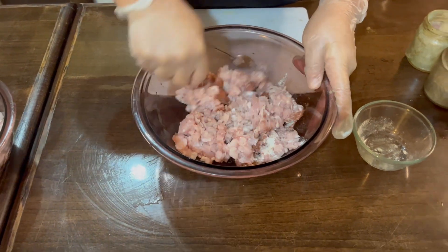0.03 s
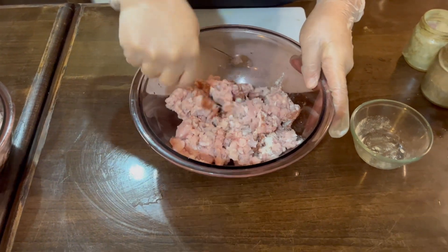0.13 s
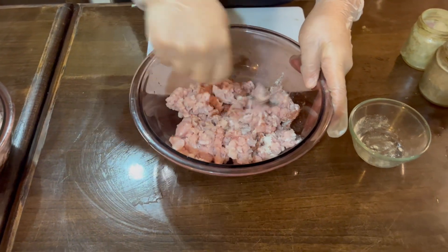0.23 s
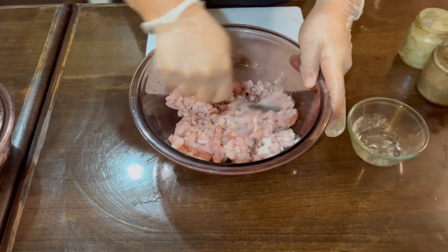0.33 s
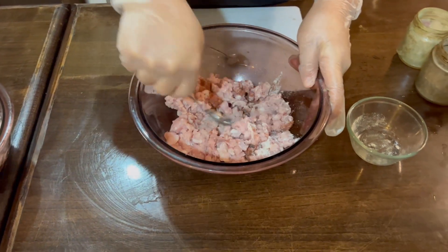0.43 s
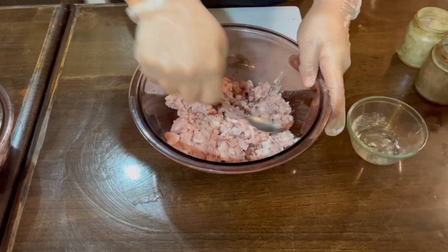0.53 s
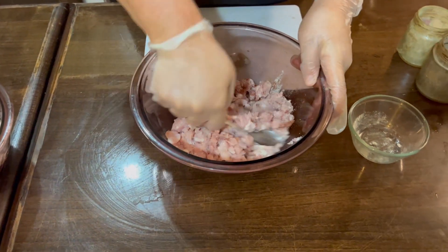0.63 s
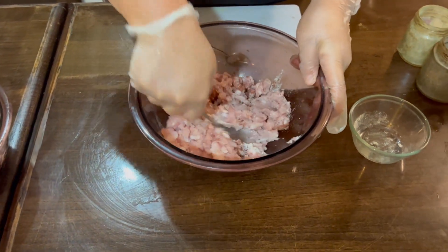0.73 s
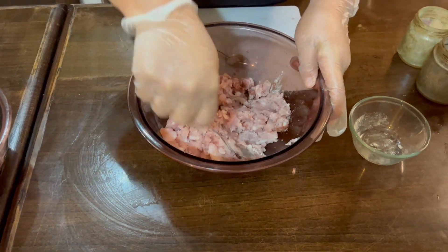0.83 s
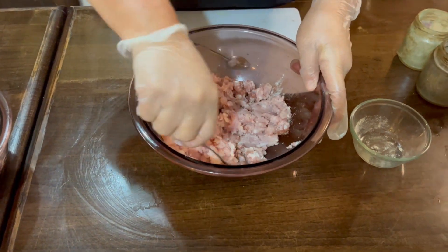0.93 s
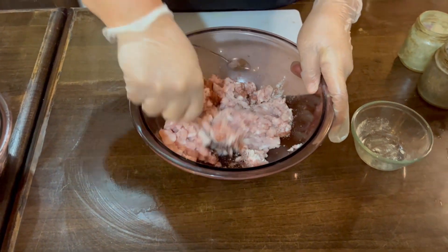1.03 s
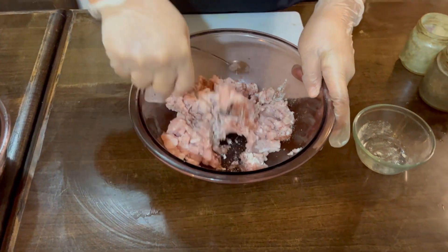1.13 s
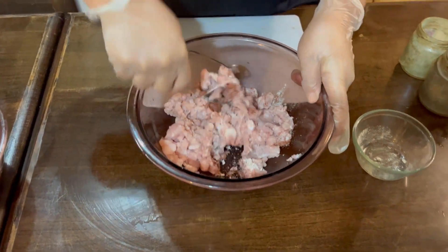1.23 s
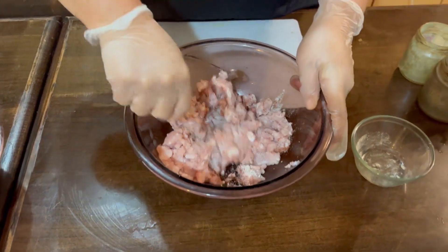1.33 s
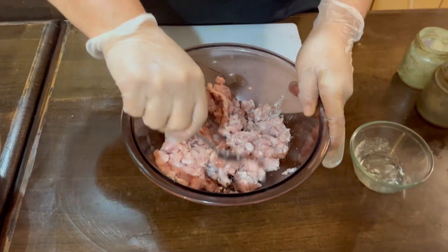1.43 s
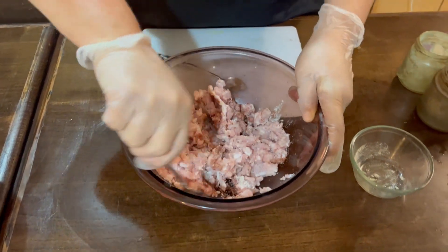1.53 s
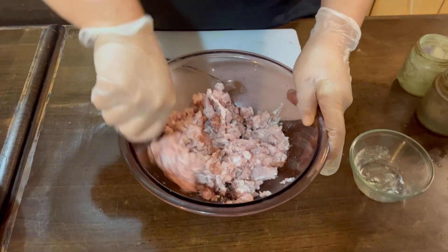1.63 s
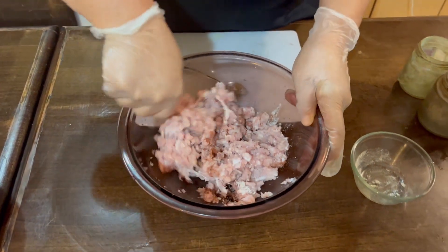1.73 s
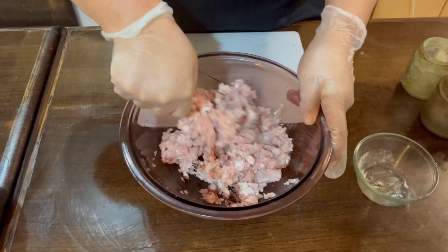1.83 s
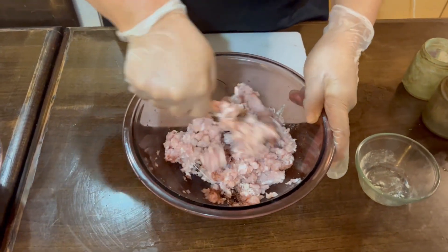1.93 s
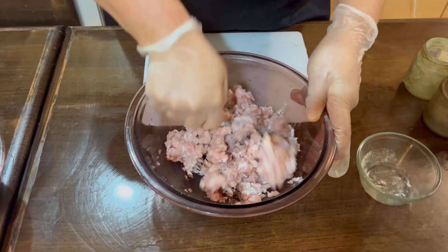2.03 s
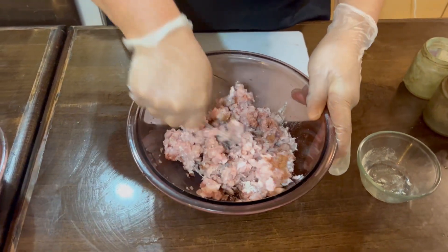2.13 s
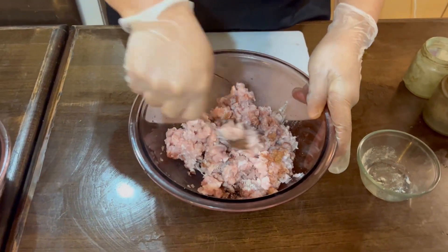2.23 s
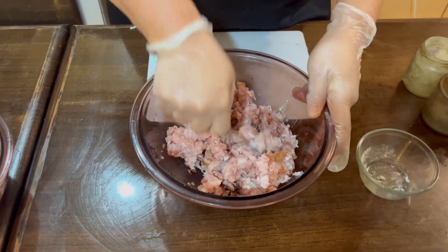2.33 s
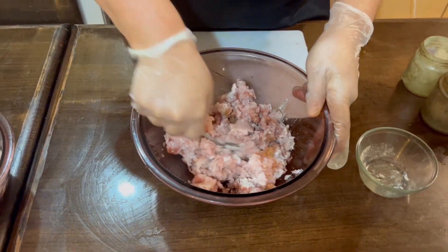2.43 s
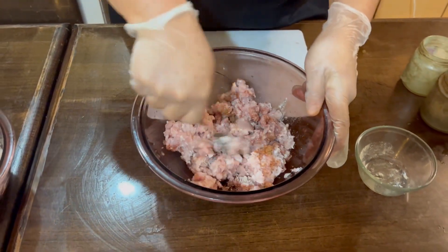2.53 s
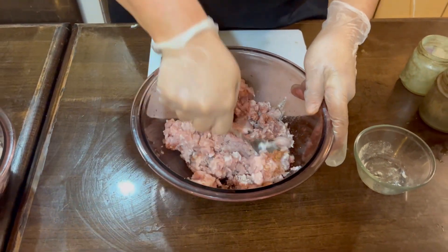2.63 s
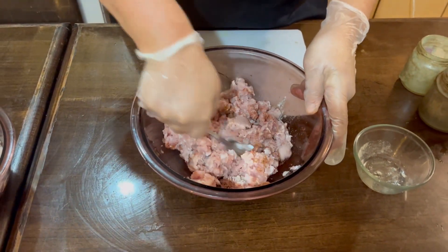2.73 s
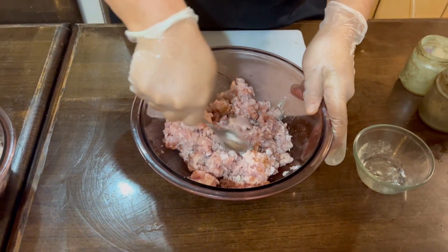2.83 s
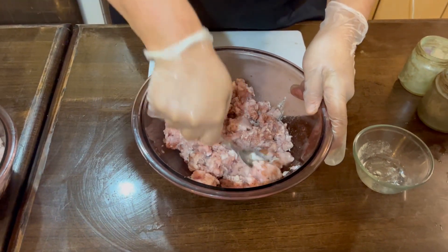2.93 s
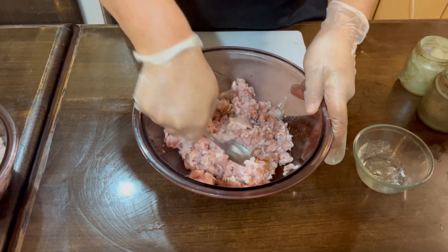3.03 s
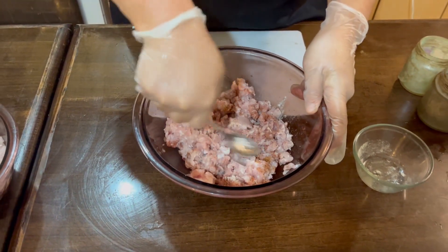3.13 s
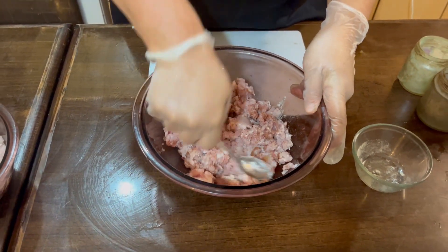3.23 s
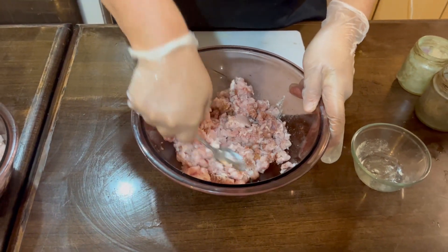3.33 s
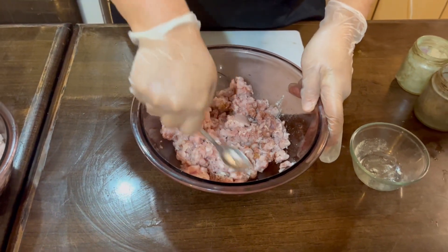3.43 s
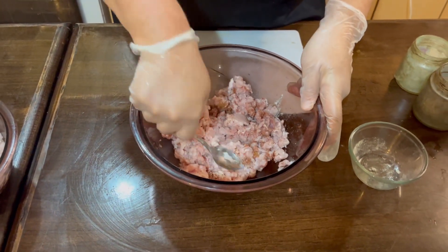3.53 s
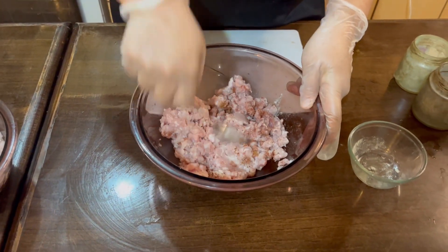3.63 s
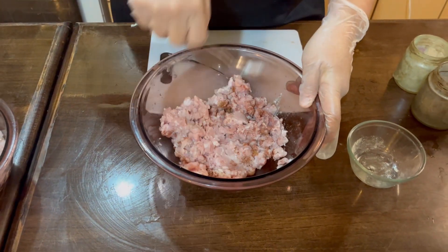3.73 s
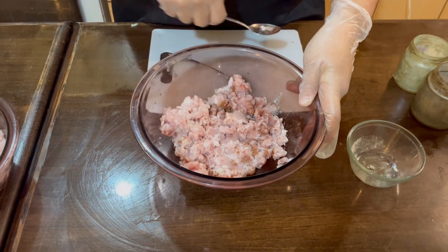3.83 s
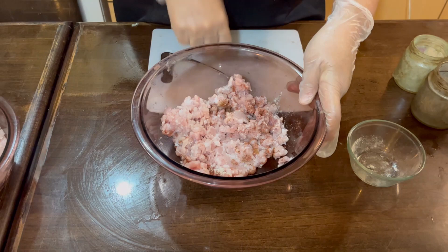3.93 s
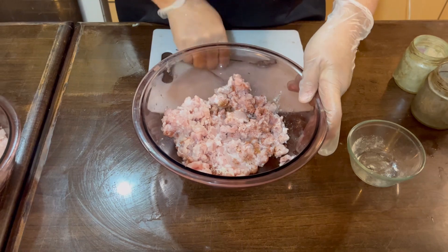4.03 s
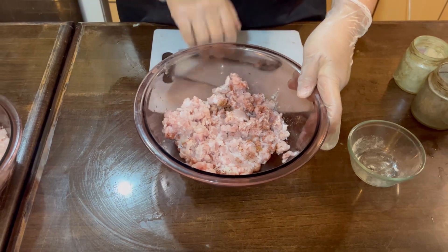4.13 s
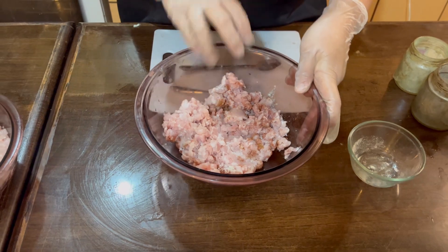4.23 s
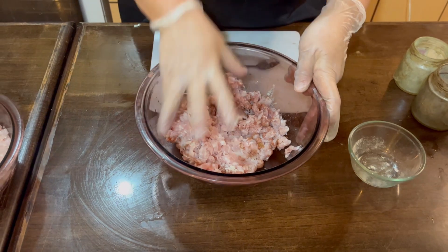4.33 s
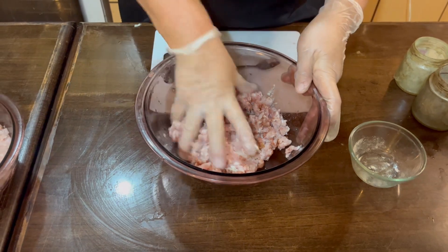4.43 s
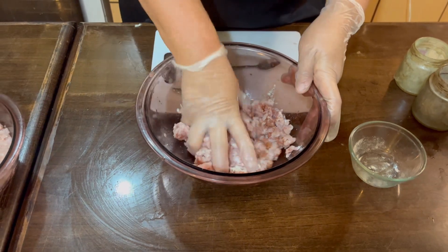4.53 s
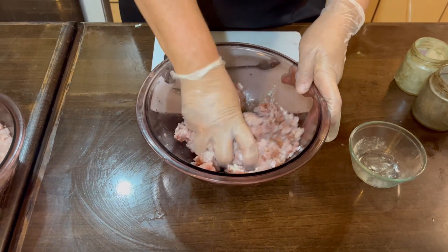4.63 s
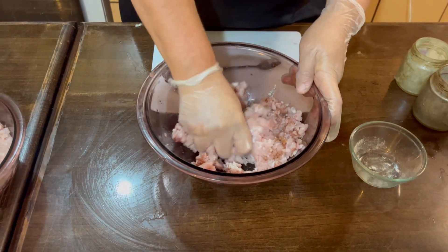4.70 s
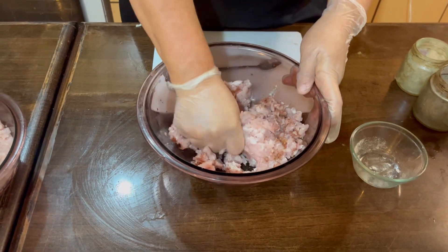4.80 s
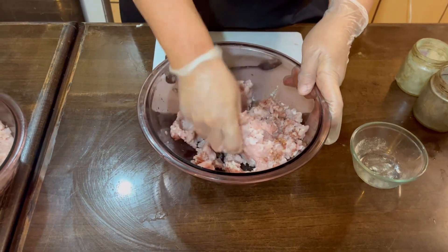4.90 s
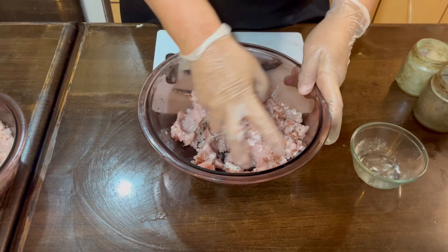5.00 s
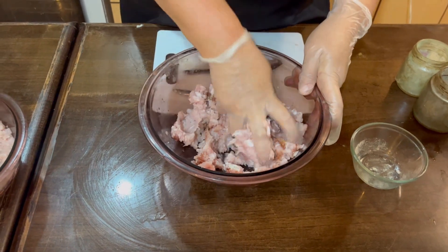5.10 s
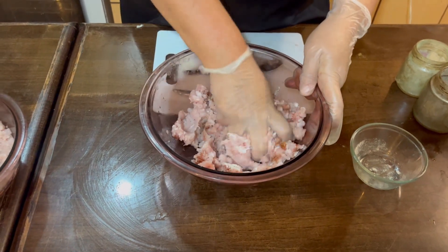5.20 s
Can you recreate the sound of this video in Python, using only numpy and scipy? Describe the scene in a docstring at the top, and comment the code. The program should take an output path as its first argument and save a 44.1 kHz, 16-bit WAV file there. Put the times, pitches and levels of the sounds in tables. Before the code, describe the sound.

Close, moist mixing of minced meat, glass taps and woody knocks; a spoon drops loudly on a board, rattles, then softer hand squelching.

```python
"""Wet minced meat is worked in a glass bowl, first with a spoon, then with gloved fingers: noise
and short ringing grains crackle and slosh, and brief noise bursts pop. Damped modes sound the spoon's
taps on the glass and the bowl's knocks, shaking and groans on a wooden table; late on the spoon drops
on a chopping board, bounces and rattles. A quiet kitchen adds a diffuse tail and room tone;
a two-port microphone is close by."""
import sys
import numpy as np
from scipy import signal
from scipy.fft import rfft, irfft
from scipy.io import wavfile
from scipy.ndimage import uniform_filter1d

SR = 44100
rng = np.random.default_rng(int(sys.argv[2]) if len(sys.argv) > 2 else 0)


def store_pcm(level_fs):
    """Save levels as 16-bit WAV."""
    pcm = np.round(np.clip(level_fs, -1, 1) * 32767).astype(np.int16)
    wavfile.write(sys.argv[1], SR, np.atleast_2d(pcm).T)


N = 232040

# Pressure of the bowl, which shakes the wood. Each row: time in seconds, rms level in dB.
SHAKE = [(0, -30.5), (.25, -38), (.8, -38.5), (1.9, -43), (4, -42), (5.26, -41)]
# Strokes through the mince. Each row: start in seconds, length in seconds, crackle in dB, wet slosh in dB.
STROKES = [(0.032, 0.13, -44, -46.5), (0.195, 0.18, -54, -51.5), (0.302, 0.16, -43.5, -45),
           (0.545, 0.11, -58, -49.5), (0.619, 0.072, -32.5, -33), (0.737, 0.046, -42.5, -48),
           (0.89, 0.11, -42.5, -51), (0.998, 0.0076, -34.5, -52), (1.054, 0.13, -38, -43),
           (1.247, 0.017, -37.5, -51), (1.326, 0.072, -40, -44), (1.61, 0.2, -32.5, -38.5),
           (1.68, 0.062, -32.5, -40.5), (1.808, 0.14, -44.5, -43), (1.887, 0.12, -50, -65),
           (2.038, 0.15, -43.5, -49), (2.36, 0.06, -51, -42.5), (2.434, 0.074, -41, -51.5),
           (2.685, 0.05, -42.5, -44.5), (2.776, 0.067, -44.5, -55), (2.945, 0.13, -47.5, -51),
           (3.108, 0.0088, -46.5, -52), (3.263, 0.13, -44, -52.5), (3.514, 0.0081, -44, -53),
           (3.6, 0.0083, -43, -53), (4.468, 1, -42.5, -45.5), (4.629, 0.11, -38, -41.5),
           (4.716, 0.095, -48, -43), (4.842, 0.16, -42.5, -49.5), (5.113, 0.099, -44, -46),
           (5.226, 0.16, -43, -41)]
# Mince tearing loose. Each row: time in seconds, peak of the crack in dB, pitch in Hz.
POPS = [(0.698, -25, 2900), (1.121, -23.5, 6500), (1.1579, -24, 3250), (1.315, -23, 6800),
        (1.6027, -13.5, 5500), (1.68, -20, 2020), (1.683, -8, 12000), (1.709, -9.5, 1914),
        (1.7075, -11.5, 9000), (1.8582, -26, 11000), (1.737, -14.5, 5350), (2.0952, -29.5, 5950),
        (2.14, -31.5, 4000), (2.342, -34.5, 3160), (2.374, -26.5, 3340), (2.441, -29.5, 6050),
        (2.475, -27.5, 5000), (2.516, -29, 6500), (2.777, -31.5, 2550), (2.825, -30.5, 3620),
        (3.246, -32, 3750), (3.26, -26, 3920), (2.9813, -24.5, 3540), (3.1112, -31, 5800),
        (3.3843, -31.5, 3700), (3.6075, -24.5, 4100), (4.619, -25, 1680), (4.481, -29, 3000),
        (4.755, -25, 3000), (4.7924, -11, 11600), (4.8007, -16.5, 11500), (4.905, -21, 3320),
        (4.918, -11.5, 5270), (4.926, -15, 6500)]
# Spoon on glass. Each row: start in seconds, peak of the crack in dB, ring of the bowl in dB,
# ring of its lowest mode in dB, peak of the dull knock in dB.
TAPS = [(0.308, -1.5, -33.5, -50, -19), (0.619, -11, -36, -54, -26.5), (0.88, -25, -32.5, -47, -30),
        (1.286, -38, -67, -42.5, -33.5), (1.5425, -32, -29, -52, -19), (1.564, -60, -50, -30.5, -45),
        (2.711, -24.5, -62, -51, -31), (3.512, -25, -67, -61, -34), (5.105, -43, -50, -40, -57)]
# Deep thumps through the table legs. Each row: time in seconds, strength in dB, slap of the bowl foot in dB.
THUMPS = [(0.059, -12.5, -25.5), (0.309, -22, -40), (0.622, -18.5, -45), (0.692, -14, -49),
          (0.887, -26, -56), (1.295, -9.5, -27), (2.05, -25.5, -39.5), (3.316, -13, -34), (3.503, -18, -43),
          (4.199, -12, -14.5), (4.361, -14.5, -40), (4.477, -15.5, -59), (4.879, -12.5, -78),
          (5.102, -19.5, -28.5)]
# Bowl knocking the table. Each row: time in seconds, strength in dB.
KNOCKS = [(0.066, -16), (0.316, -20.5), (0.527, -28.5), (0.57, -28.5), (0.623, -21), (0.696, -21.5),
          (0.874, -24.5), (0.906, -32), (0.945, -39), (0.986, -32), (1.287, -26), (1.474, -30), (1.55, -22),
          (2.588, -23.5), (2.611, -23), (2.688, -32), (2.733, -30), (2.891, -24.5), (2.936, -28),
          (3.013, -34), (3.058, -40), (3.181, -21), (3.204, -25.5), (3.27, -25), (3.333, -29.5),
          (3.513, -25.5), (4.191, -15), (4.357, -20.5), (4.685, -25.5), (4.746, -22.5), (4.811, -26),
          (4.879, -20.5), (5.101, -24.5)]
# The bowl's foot slides and the table groans. Each row: start in seconds, length in seconds,
# rms level in dB, pitch in Hz.
GROANS = [(0.75, 0.087, -33, 170), (0.928, 0.22, -32, 153), (0.915, 0.058, -35, 177.6),
          (2.646, 0.15, -37.5, 153), (4.846, 0.14, -29, 153)]
# Spoon landing on the board. Each row: time in seconds, peak of the crack in dB, board in dB,
# table in dB, spoon ring in dB.
LANDINGS = [(3.974, 0.5, -7.5, -51, -36), (4.2127, -3, -34, -5.5, -32.5), (4.216, -5, -21.5, -6.5, -45),
            (4.285, -6, -26, -31, -49), (4.2987, -15, -50, -18, -36)]
# The spoon rocks on the board. Each row: start in seconds, length in seconds, level in dB.
RATTLES = [(3.977, 0.0058, -16), (4.044, 0.38, -23), (4.219, 0.0055, -14.5), (4.285, 0.033, -21)]
# Light touches of the rocking spoon. Each row: time in seconds, strength in dB, pitch in Hz.
TICKS = [(4.0551, -30, 2930), (4.0862, -22, 1200)]

# Modes of the table top, of the table on its legs, of the bowl, the board and the spoon.
# Each row: frequency in Hz, relative level in dB, t60 in seconds.
TABLE_MODES = [(152.6, -11.5, 0.48), (176.7, -12.5, 0.51), (210.2, 1.5, 0.19), (248, -2.5, 0.049),
               (293.6, -7.5, 0.075), (448, -15, 0.096)]
THUMP_MODES = [(60, -12, 0.21), (101, -14, 0.097)]
BOWL_MODES = [(540, 2, 0.22), (1442, -13.5, 0.56), (1180, 2, 0.035), (1456, -5, 0.32), (2203, 12, 0.019),
              (4150, -0.5, 0.12), (4440, 9, 0.043), (5500, -6, 0.064), (6500, -8, 0.031)]
BOARD_MODES = [(342.3, 5, 0.14), (450, -2.5, 0.095), (537.4, -5, 0.086), (691, -2, 0.029),
               (897, 5.5, 0.023), (1200, 3, 0.017), (1470, -5.5, 0.05), (1810, 4.5, 0.021),
               (2590, -2.5, 0.025)]
SPOON_MODES = [(7150, 3, 0.1), (8500, 0, 0.1), (9500, 3, 0.24), (11670, 1, .2)]

# Spectral weightings of crackle, slosh, room tone and rattle. Each row: frequency in Hz, relative level in dB.
CRACKLE_SPECTRUM = [(1500, -11.5), (3500, -10), (6500, -2.5), (9000, 2.5), (12000, 0.5), (15500, 1.5)]
SLOSH_SPECTRUM = [(350, 7), (1000, 1), (2000, 0), (3500, 2), (6000, -9.5)]
HUSH_SPECTRUM = [(30, -35), (55, 2.5), (100, -4), (200, -0.5), (480, -10), (800, -22), (1200, -13),
                 (1650, -9.5), (2400, -21), (5000, -31), (15500, -34.5)]
RATTLE_SPECTRUM = [(70, -69), (150, -20.5), (225, -4.5), (400, -6), (750, -22), (1300, -22), (2500, -24.5),
                   (7000, -31), (15000, -40.5)]

# Phase between the ports. Each row: frequency in Hz, lead of the left in radians.
LEAD = [(0, 0.19), (1800, 0.73), (3000, 0.97), (4650, 1), (5700, -1.2), (6600, -1.2), (7700, -2.8),
        (8900, -3.4), (11200, -5.9), (12900, -6.8), (15300, -9.5)]
# Correlation of diffuse sound at the ports. Each row: frequency in Hz, likeness from 0 to 1.
ALIKE = [(60, 0.91), (300, 1), (700, 0.21), (1400, 0), (2400, 0.44), (9000, 0.9)]
# Level between the ports. Each row: frequency in Hz, left over right in dB.
LEFT_OVER_RIGHT = [(60, 1), (200, 3), (600, 1), (2000, 1.5), (6000, 1)]
# Decay of the kitchen. Each row: frequency in Hz, t60 in seconds.
KITCHEN_T60 = [(100, 0.55), (1000, 0.38), (5000, 0.27), (15000, 0.14)]

KITCHEN_DB, HUSH_DB = -6.5, -49.5
CUTOFF_HZ = 15735
PRESSED_S = (2.5, 3.3)   # from, to: the bowl is held down hard
PRESSED, UNDER_BOARD = (0.95, 0.64), (1.065, 0.67)   # loads on the table: (pitch ratio, t60 ratio)
SPREAD_DB = 1.5   # how much blows differ from mode to mode
JOLT_DB = 2   # unevenness of shake, hiss and rattle
STROKE_RISE_DB_PER_S, STROKE_FALL_DB_PER_S = 727, 367
CRACKLE_SAG_DB_PER_S, SLOSH_SAG_DB_PER_S = 32.5, 49   # fading while the stroke lasts
GROAN_RISE_DB_PER_S, GROAN_SAG_DB_PER_S, GROAN_FALL_DB_PER_S = 142, 42, 295
RATTLE_RISE_DB_PER_S, RATTLE_SAG_DB_PER_S, RATTLE_FALL_DB_PER_S = 2000, 35, 221
SPOON_SMEAR_DB, GLOVE_SMEAR_DB, GLOVE_FROM_S = -7.5, 1, 4.42   # hiss under the clicks, more under the glove
WET_SMEAR_DB = 9   # extra hiss that smooths the slosh
POP_NOTE_DB = -8.5   # hollow note of a pop, against its crack
GLINT_DB = -28.5   # upper modes of the bowl, against the crack of the tap
CHATTER_PER_S, CHATTER_DB = 60, 3   # distinct touches standing out of the rattle
BOARD_RATTLE_DB = -14.5   # ringing board, against the rattle's noise
TICK_T60_S = 0.04


def from_db(db):
    """Logarithmic level: 20 dB is a factor of ten in amplitude."""
    return 10 ** (np.asarray(db) / 20)


def rms_one(x):
    """Normalisation: scale to rms 1."""
    return x / np.sqrt(np.mean(x ** 2) + 1e-20)


def at_hz(points, hz):
    """Interpolation: read a table along log frequency."""
    table_hz, values = np.transpose(points)
    return np.interp(np.log(hz + 1), np.log(table_hz), values)


def colour(x, spectrum):
    """Linear filtering: weight the spectrum of a signal, then scale to rms 1."""
    hz = np.fft.rfftfreq(N, 1 / SR)
    return rms_one(irfft(rfft(x) * from_db(at_hz(spectrum, hz)), N))


def drift(rate_hz):
    """Low-passed noise: a slow random wander of rms 1."""
    r = np.exp(-2 * np.pi * rate_hz / SR)
    settled = signal.lfilter([1], [1, -2 * r, r * r], rng.standard_normal(N + SR))[SR:]
    return rms_one(settled)


def ring(force, hz, t60):
    """Damped resonance: a unit click sets off a decaying sine of height about 1."""
    r = from_db(-60 / (max(t60, 1e-4) * SR))
    w = 2 * np.pi * min(hz, .45 * SR) / SR
    return signal.lfilter([0, np.sin(w)], [1, -2 * r * np.cos(w), r * r], force + 1e-18)


def strike(times, db, modes, soft_hz):
    """Modal superposition: each blow excites every mode by chance; a soft contact dulls the treble."""
    at = (np.asarray(times) * SR).astype(int)
    out = np.zeros(N)
    luck = rng.standard_normal((len(at), len(modes)))
    for k, (hz, mode_db, t60) in enumerate(modes):
        force = np.zeros(N)
        force[at] = from_db(db + mode_db + SPREAD_DB * luck[:, k]) * (-1) ** k
        out += ring(force, hz, t60)
    contact = signal.butter(2, min(soft_hz, .45 * SR), fs=SR, output="sos")
    return signal.sosfilt(contact, out)


def loaded(modes, pitch, damping):
    """Loading of a body: modes above the first two shift in pitch, all change their decay time."""
    return [(hz * (pitch if k > 1 else 1), db, t60 * damping) for k, (hz, db, t60) in enumerate(modes)]


def add(out, s, db, low_hz, high_hz, t60):
    """Broadband transient: add a band of noise that decays exponentially, with its peak at db."""
    t = np.arange(4096) / SR
    edges = np.clip([low_hz, high_hz], 50, [.4 * SR, .45 * SR])
    band = signal.butter(2, edges, "band", fs=SR, output="sos")
    burst = signal.sosfilt(band, rng.standard_normal(len(t)) * from_db(-60 * t / t60))
    burst *= from_db(db) / np.abs(burst).max()
    i = int(s * SR)
    out[i:i + len(t)] += burst[:N - i]


def swell(start, length, db, rise, sag, fall):
    """Power addition of gestures: each rises, sags while it lasts, then falls away (dB a second)."""
    length, db = length[:, None], db[:, None]
    t = np.arange(N) / SR - np.asarray(start)[:, None]
    loss = rise * np.maximum(-t, 0) + sag * np.clip(t, 0, length) + fall * np.maximum(t - length, 0)
    return np.sqrt(np.sum(from_db(2 * (db - loss)), axis=0))


def grains(per_s, low_hz, high_hz, cycles, size_db):
    """Random impulse process: clumped clicks, each dying 60 dB in a few cycles at its own pitch; rms 1."""
    sizes = from_db(size_db * np.minimum(rng.exponential(1, N), 3.5)) * rng.choice([-1, 1], N)
    born = rng.random(N) < per_s * from_db(7.0 * drift(40)) / SR   # the rate wanders, so clicks clump
    clicks = sizes * born
    pitches = np.geomspace(low_hz, high_hz, num=10)
    dealt = rng.integers(0, 10, N)
    out = np.zeros(N)
    for k, hz in enumerate(pitches):
        out += ring(clicks * (dealt == k), hz, cycles / hz) * np.sqrt(hz)   # equal energy at each pitch
    return rms_one(out)


def diffuse(length):
    """Spatial coherence: white noise at two ports, alike as far as the wavelength allows."""
    alike = np.clip(at_hz(ALIKE, np.fft.rfftfreq(length, 1 / SR)), 0, 1)
    mid, side = rfft(rng.standard_normal((2, length)))
    return irfft(np.sqrt(1 + alike) * mid + np.sqrt(1 - alike) * side * [[1], [-1]], length)


def table_shake():
    """Forced vibration: uneven noise from the pressing bowl drives the modes of the table."""
    jolts = rng.standard_normal(N) * from_db(JOLT_DB * drift(7.4))
    shake = np.zeros(N)
    for hz, db, t60 in TABLE_MODES + THUMP_MODES:
        shake += from_db(db) * ring(jolts, hz, 0.49 * t60)   # shorter decay than after a blow
    s, level_db = np.transpose(SHAKE)
    return from_db(np.interp(np.arange(N) / SR, s, level_db)) * rms_one(shake)


def hush():
    """Diffuse background field: room tone as coloured noise whose level wanders slightly."""
    left, right = diffuse(N)
    level = from_db(HUSH_DB + 0.53 * drift(1.6))
    return level * np.array([colour(left, HUSH_SPECTRUM), colour(right, HUSH_SPECTRUM)])


def mince():
    """Granular friction: wet fibres part in clicks over a smeared hiss, trapped air smacks lower down."""
    s, length, crackle_db, slosh_db = np.transpose(STROKES)
    smear_db = np.where(np.arange(N) / SR < GLOVE_FROM_S, SPOON_SMEAR_DB, GLOVE_SMEAR_DB)
    smear = rng.standard_normal((2, N)) * from_db(smear_db + JOLT_DB * drift(32))
    fibres = grains(670, 3750, 17300, cycles=7.3, size_db=5.0)
    smacks = grains(900, 1800, 5135, cycles=8.0, size_db=3.5)
    crackle = colour(fibres + smear[0], CRACKLE_SPECTRUM)
    slosh = colour(smacks + from_db(WET_SMEAR_DB) * smear[1], SLOSH_SPECTRUM)
    out = crackle * swell(s, length, crackle_db, STROKE_RISE_DB_PER_S, CRACKLE_SAG_DB_PER_S, STROKE_FALL_DB_PER_S)
    out += slosh * swell(s, length, slosh_db, STROKE_RISE_DB_PER_S, SLOSH_SAG_DB_PER_S, STROKE_FALL_DB_PER_S)
    return out


def kitchen(x):
    """Reverberation: convolution with diffuse noise that decays at its own rate in each octave."""
    t = np.arange(SR) / SR
    edges = 80 * 2.0 ** np.arange(9)
    white, tail = diffuse(SR), 0
    for low, high in zip(edges, edges[1:]):
        band = signal.sosfilt(signal.butter(2, [low, high], "band", fs=SR, output="sos"), white)
        tail = tail + band * from_db(-60 * t / at_hz(KITCHEN_T60, np.sqrt(low * high)))
    tail *= 1 - np.exp(-t / 0.00078)   # the tail builds up within a few ms
    tail /= np.sqrt(np.sum(tail ** 2, axis=1, keepdims=True))
    return signal.fftconvolve(x[None], tail, axes=1)[:, :N]


def table_thumps():
    """Low-frequency resonance: thumps ring the deepest modes while the bowl foot slaps the wood."""
    s, thump_db, slap_db = np.transpose(THUMPS)
    out = strike(s, thump_db, THUMP_MODES, soft_hz=180.4)
    for k in range(len(s)):
        add(out, s[k], slap_db[k], 230, 650, .14)
    return out


def table_knocks():
    """Impact on a plate: the bowl rings the table modes, flatter and shorter while held down hard."""
    s, knock_db = np.transpose(KNOCKS)
    pressed = (s > PRESSED_S[0]) & (s < PRESSED_S[1])
    out = strike(s[~pressed], knock_db[~pressed], TABLE_MODES, soft_hz=434)
    out += strike(s[pressed], knock_db[pressed], loaded(TABLE_MODES, *PRESSED), soft_hz=300)
    return out


def bowl_taps():
    """Impact on a shell: a tap cracks and knocks dully; the loaded glass rings briefly."""
    s, crack_db, ring_db, low_db, knock_db = np.transpose(TAPS)
    out = strike(s, ring_db, BOWL_MODES[1:4], soft_hz=8900)
    out += strike(s, low_db, BOWL_MODES[:1], soft_hz=920)
    out += strike(s, crack_db + GLINT_DB, BOWL_MODES[4:], soft_hz=12000)
    for k in range(len(s)):
        add(out, s[k], crack_db[k], 2500, 9500, .012)
        add(out, s[k], knock_db[k], 650, 1350, .03)
    return out


def mince_pops():
    """Sudden release: mince tears loose with a wide-band crack and a narrow, hollow note."""
    out = np.zeros(N)
    for s, db, hz in POPS:
        add(out, s, db, 0.59 * hz, 3.34 * hz, .01)
        add(out, s, db + POP_NOTE_DB, 0.954 * hz, 1.097 * hz, .014)
    return out


def table_groans():
    """Friction-driven tone: the sliding foot sounds a low sine whose pitch wavers."""
    wavering_s = np.cumsum(1 + 0.0078 * drift(16.0)) / SR
    out = np.zeros(N)
    for row in np.array(GROANS):
        note = np.sqrt(2) * np.sin(2 * np.pi * row[3] * wavering_s)
        out += swell(*row[:3, None], GROAN_RISE_DB_PER_S, GROAN_SAG_DB_PER_S, GROAN_FALL_DB_PER_S) * note
    return out


def spoon_landings():
    """Impact of coupled bodies: each landing cracks, thuds the board and the table, and rings the steel."""
    s, crack_db, board_db, table_db, steel_db = np.transpose(LANDINGS)
    out = strike(s, board_db, BOARD_MODES, soft_hz=5060)
    out += strike(s, table_db, loaded(TABLE_MODES, *UNDER_BOARD), soft_hz=715)
    out += strike(s, steel_db, SPOON_MODES, soft_hz=18000)
    for k in range(len(s)):
        add(out, s[k], crack_db[k], 1200, 9000, .02)
    return out


def spoon_rattle():
    """Repeated contact: dense little touches of the rocking spoon make noise and ring the board."""
    chatter = rng.standard_normal(N) * from_db(JOLT_DB * drift(30))
    touches = 1. * (rng.random(N) < CHATTER_PER_S / SR)
    chatter *= 1 + from_db(CHATTER_DB) * uniform_filter1d(touches, size=40) * 40   # each lasts 40 samples
    rung = np.zeros(N)
    for k, (hz, db, t60) in enumerate(BOARD_MODES[:4]):
        rung += from_db(db) * ring(chatter, hz, t60) * (-1) ** k
    rattle = colour(chatter, RATTLE_SPECTRUM) + from_db(BOARD_RATTLE_DB) * rms_one(rung)
    gain = swell(*np.transpose(RATTLES), RATTLE_RISE_DB_PER_S, RATTLE_SAG_DB_PER_S, RATTLE_FALL_DB_PER_S)
    return gain * rattle


def spoon_ticks():
    """Single-mode resonance: each light touch of the spoon is one short note."""
    out = np.zeros(N)
    for s, db, hz in TICKS:
        out += strike([s], db, [(hz, 0, TICK_T60_S)], soft_hz=5000)
    return out


def scene():
    """Superposition: all sources sit straight ahead; only the airborne ones excite the kitchen."""
    airborne = mince() + bowl_taps() + mince_pops()
    airborne += spoon_landings() + spoon_rattle() + spoon_ticks()
    table = table_shake() + table_thumps() + table_knocks() + table_groans()
    return airborne + table + from_db(KITCHEN_DB) * kitchen(airborne) + hush()


def record(dry):
    """Two-port reception: phase and level differ, deep bass is cut, peaks are clipped, the top is cut."""
    hz = np.fft.rfftfreq(N, 1 / SR)
    lead = np.interp(hz, *np.transpose(LEAD))
    tilt = from_db(at_hz(LEFT_OVER_RIGHT, hz) / 2)   # half the difference to each port
    left, right = rfft(dry)
    ports = irfft([left * tilt, right / tilt * np.exp(-1j * lead)], N)
    ports = signal.sosfilt(signal.butter(4, 45, "high", fs=SR, output="sos"), ports)
    cut = signal.ellip(8, .5, 50, CUTOFF_HZ, fs=SR, output="sos")
    return signal.sosfilt(cut, np.clip(ports, -1, 1))


dry = scene()
out = record(dry)
store_pcm(out)
```